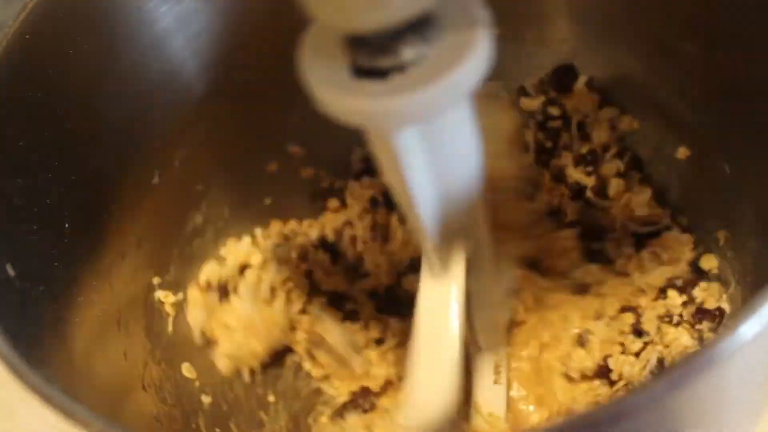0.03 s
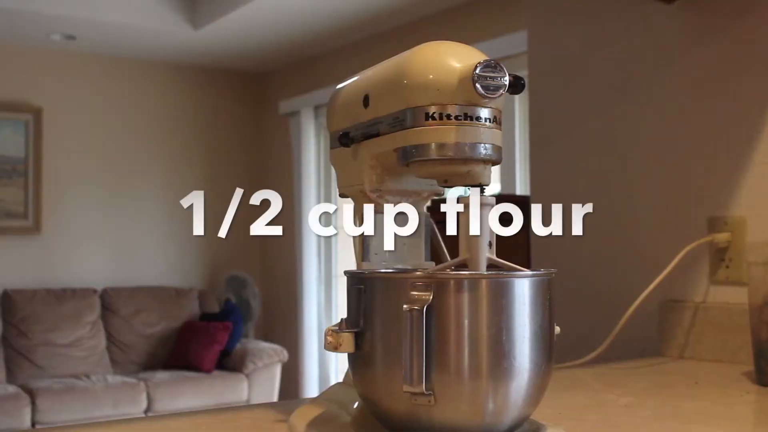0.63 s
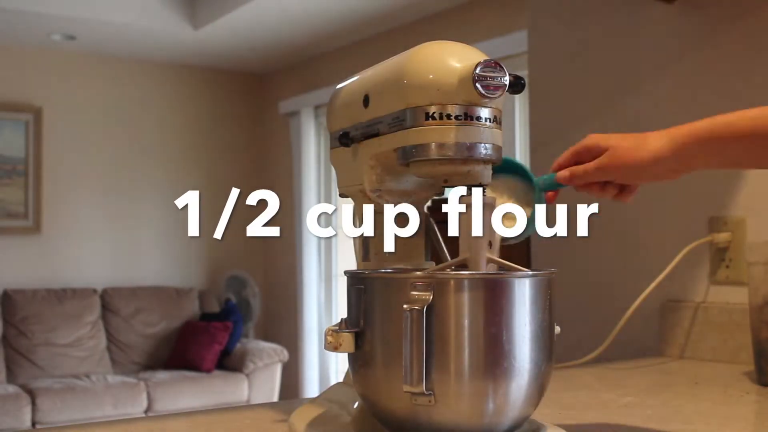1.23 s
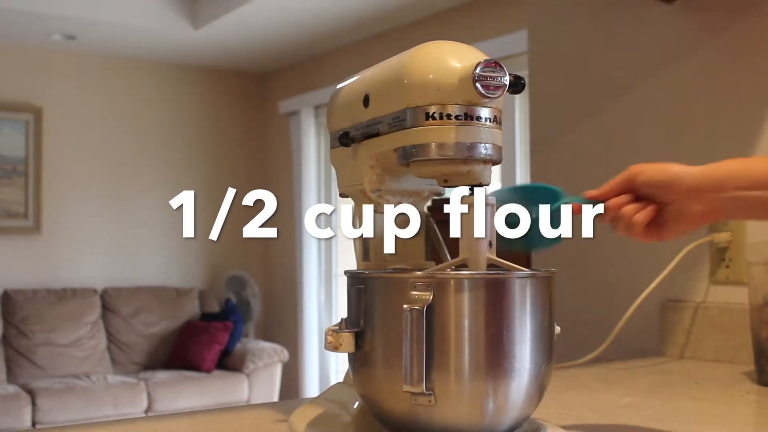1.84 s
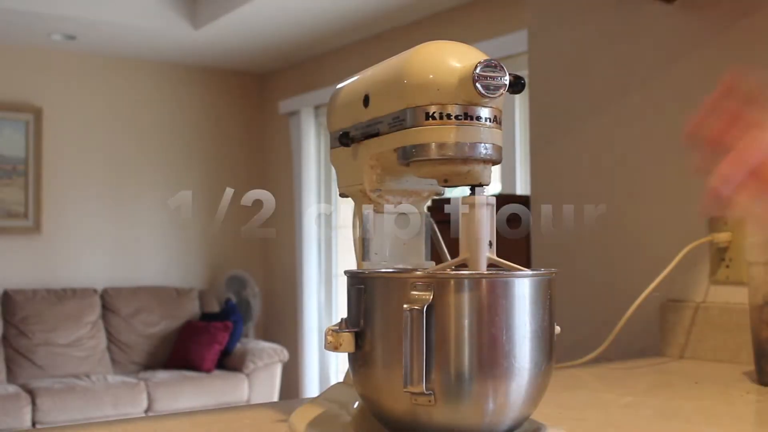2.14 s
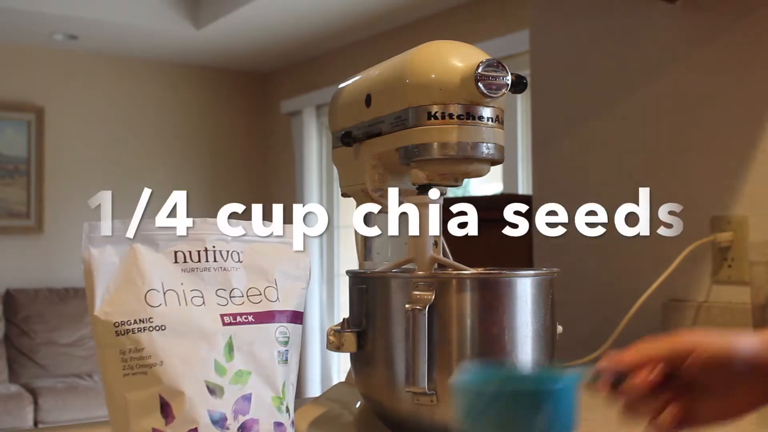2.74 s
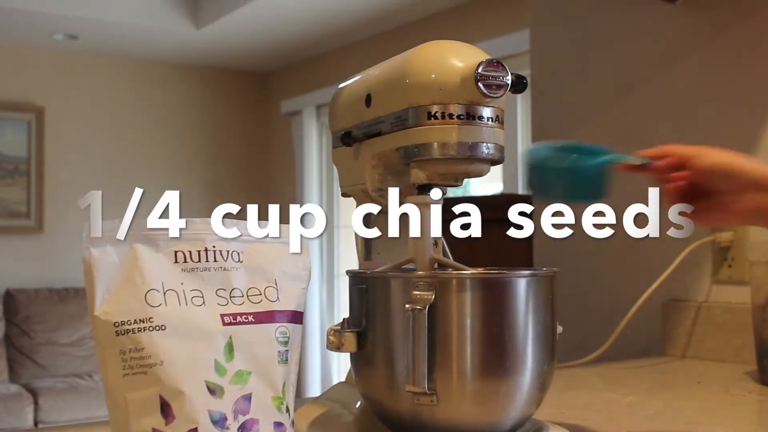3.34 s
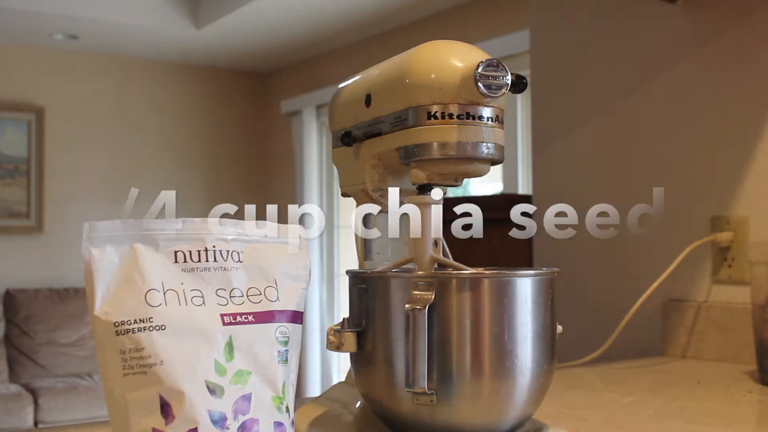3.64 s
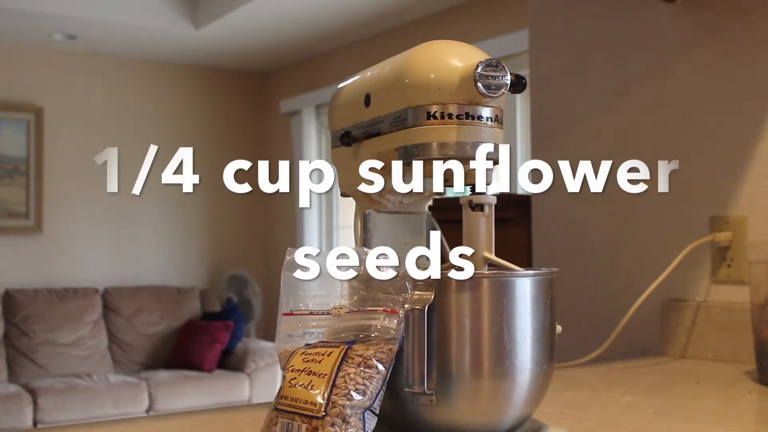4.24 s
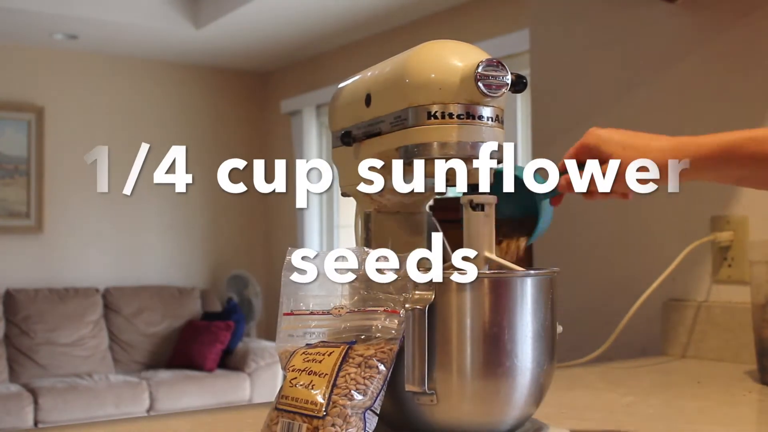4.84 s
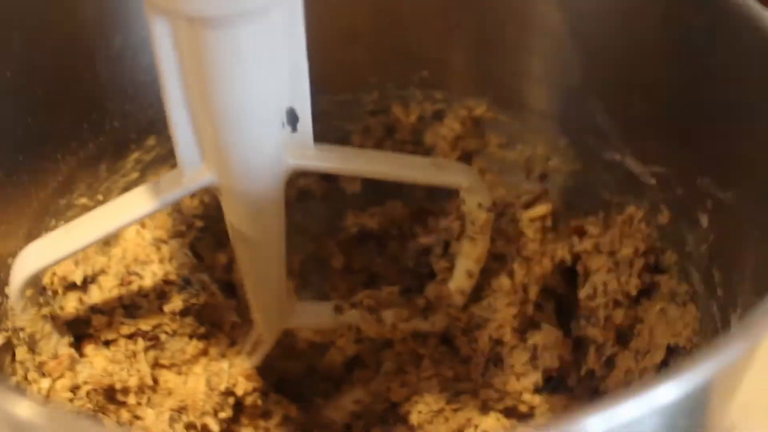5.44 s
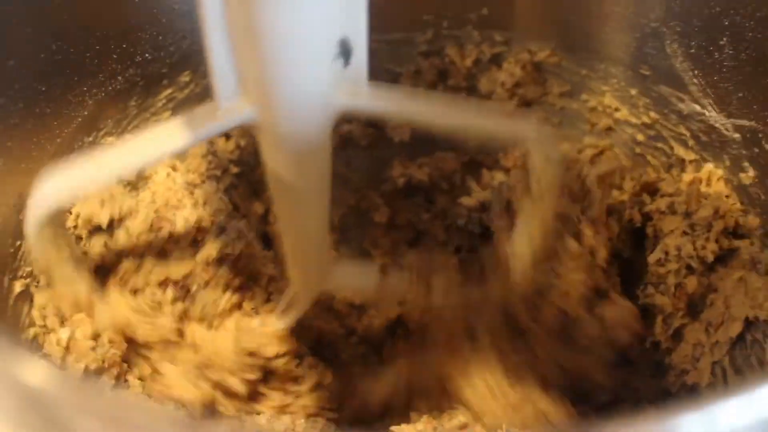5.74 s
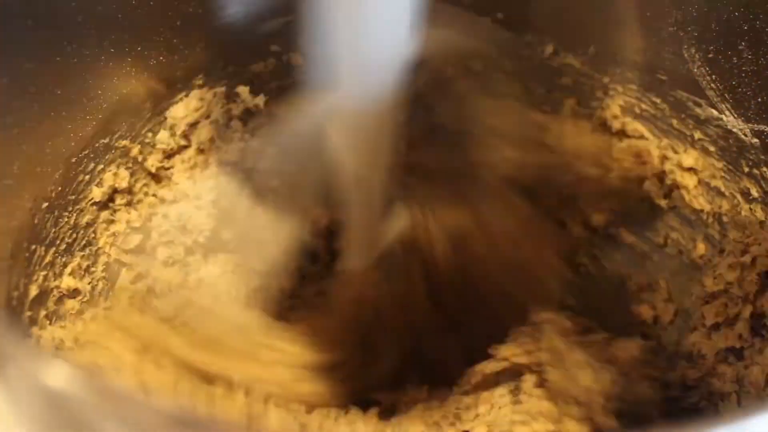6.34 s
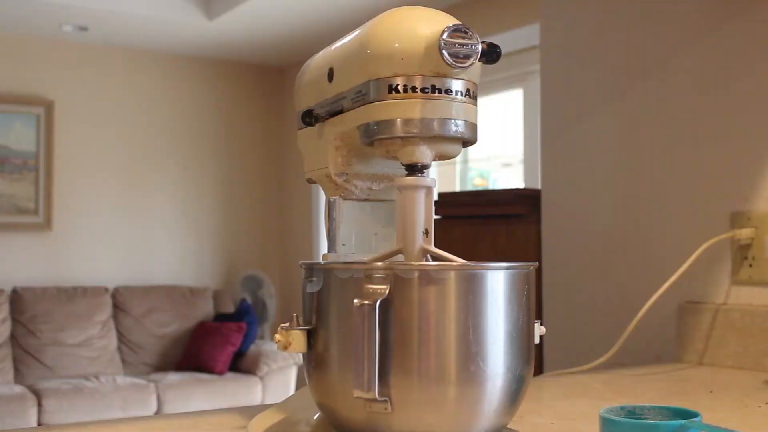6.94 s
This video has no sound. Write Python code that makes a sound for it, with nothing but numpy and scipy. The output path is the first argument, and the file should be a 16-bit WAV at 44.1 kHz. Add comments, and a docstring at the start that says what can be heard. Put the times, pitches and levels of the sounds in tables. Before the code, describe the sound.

A sharp click opens as a stand mixer coasts to a stop in dough. Over faint kitchen hiss, a measuring cup knocks quickly against a steel bowl, then clacks down three separate times with a bright ring. Between the clacks come soft thuds, sliding flour and seeds, and small plastic bag crinkles. Near the end the mixer runs for about a second, whining and rattling as its beater slaps the dough, then stops with a click.

```python
"""A sharp click, then a stand mixer coasts to a stop in cookie dough, over the hiss of a small kitchen.
Crumbs tick, things thud on the counter, flour and seeds slide. A measuring cup knocks on the steel bowl
and clacks down, ringing at each blow; a plastic bag crinkles. Then the motor runs for a second: it whines,
its gears rattle the housing and the beater slaps the dough. A soft rush rises at the end.
Impacts and friction are pulses, noise or grains through resonances; the whine is a sum of sines."""
import sys
import numpy as np
from scipy import signal
from scipy.fft import rfft, irfft
from scipy.io import wavfile
from scipy.ndimage import uniform_filter1d

SR = 44100
rng = np.random.default_rng(int(sys.argv[2]) if len(sys.argv) > 2 else 0)


def output_pcm(signal):
    """Save a mono or channel-first signal as 16-bit PCM at the path in sys.argv[1].

    Samples are clipped to [-1, 1] before scaling.
    """
    pcm = np.clip(np.atleast_2d(signal).T, -1, 1) * 32767
    wavfile.write(sys.argv[1], SR, np.round(pcm).astype(np.int16))


N = 317079
TAPS = 8192
T = np.arange(N) / SR
FREQ_HZ = np.maximum(np.arange(TAPS // 2 + 1) * SR / TAPS, 1)
SWITCH_ON_S, SWITCH_OFF_S = 5.780, 6.702

# dough dragged round the bowl: freq_hz, gain_db
DOUGH_SPECTRUM = [(24, -47), (40, -4.5), (382, -14.5), (570, -6), (646, -14), (852, 6.5), (942, -5.5),
                  (1440, -10.5), (2570, -2.5), (3060, -12.5), (4460, -7.5), (14800, -18.5), (16000, -11)]
# bowl ringing around the dough: freq_hz, width_hz, gain_db
FILLED_BOWL_MODES = [(575, 41, 2.5), (850, 61, -5), (2500, 130, -11), (3380, 43, -0.5)]
# room hiss: freq_hz, gain_db
AIR_SPECTRUM = [(15, -87), (25, -28), (92, 0), (117, -12), (149, -1.5), (180, -7.5), (326, -3), (677, -2),
                (1040, -2.5), (1890, -4.5), (3520, -6.5), (6050, -7.5), (8140, -11), (11000, -9.5),
                (16000, -14.5)]
# a sharp, bright click at the very start, then dry ticks: start_s, level_db, pitch_hz, t60_s
DRY_TICKS = [(.013, -19, 14600, 0.015), (.481, -45, 9000, 0.065), (.701, -39, 9000, 0.017),
             (.797, -43, 7000, .025), (.868, -42.5, 5000, 0.093), (.997, -36, 10900, 0.059),
             (1.032, -37, 10900, 0.03), (1.103, -42, 10000, .04), (4.181, -27.5, 5560, 0.007),
             (4.602, -25, 7000, 0.026), (5.422, -34, 10930, 0.018), (5.704, -41, 11000, 0.056),
             (5.738, -34, 8850, 0.018), (6.7625, -15, 9050, 0.017), (6.976, -35, 5170, 0.018),
             (6.997, -26.5, 13100, .005)]
# dough slapped on the bowl: start_s, level_db
DOUGH_SLAPS = [(.101, -32), (5.981, -24.5), (6.59, -25.5)]
# gears jerking into motion: start_s, level_db, pitch_hz, t60_s
GEAR_JERK = [(5.797, -16, 4540, 0.066)]
# hand and cup scuffs: middle_s, level_db, pitch_hz
HAND_SCUFFS = [(.288, -44, 5800), (.737, -49.5, 1970), (1.122, -51, 1690), (1.487, -44, 1550),
               (2.965, -55, 1800), (3.463, -52, 2900), (3.835, -51.5, 1770), (4.192, -53.5, 2370),
               (4.705, -52, 5900)]
# things set on the counter: start_s, level_db, pitch_hz, boom_db
COUNTER_THUDS = [(.827, -37.5, 197, -40), (.995, -41, 175, -46.5), (2.228, -52.5, 380, -59),
                 (2.619, -43, 240, -57), (3.655, -54, 100, -63), (4.402, -52, 280, -52),
                 (5.262, -49, 150, -51)]
# sliding flour and seeds: middle_s, half_length_s, level_db
INGREDIENT_POURS = [(1.166, 0.021, -44), (2.06, .035, -52), (3.725, .031, -50.5), (4.516, 0.0335, -47.5),
                    (4.75, 0.13, -52.5), (4.97, 0.054, -47.5)]
# measuring cup: freq_hz, width_hz, gain_db
CUP_MODES = [(3840, 1080, -16), (5120, 370, 0.5), (5540, 130, 0), (5890, 186, 6), (6080, 100, -2),
             (11000, 410, -8), (11370, 210, -15), (16400, 820, -24)]
# steel bowl and beater: freq_hz, width_hz, gain_db
BOWL_MODES = [(750, 600, -12.5), (1630, 260, 5), (2340, 220, -7), (2930, 130, -3), (3450, 150, -2.5),
              (3830, 240, -2), (4700, 3500, -14), (5950, 140, -4), (7170, 160, -10), (7930, 100, -4),
              (10950, 300, 1.5), (14200, 3000, -12.5)]
# cup on bowl: start_s, bowl_db, cup_db, cutoff_hz
BOWL_KNOCKS = [(1.5907, -29, -13.5, 12500), (1.686, -32.5, -35, 15000), (1.705, -27, -19, 14000),
               (1.7175, -22, -24, 14000), (1.7215, -23.5, -37, 12000), (1.7442, -22.5, -40, 12000),
               (1.777, -21.5, -39, 13000), (1.861, -12.5, -18.5, 2500), (4.749, -29.5, -22.5, 5600)]
# cup clacks: start_s, ring_db, pitch_ratio, crack_db, overload_pop_db, flight_s, rebound_db, chatter_db
CUP_CLACKS = [(2.119, 5.5, 1, -22, -51, 0.032, -15, -41.5), (3.5634, 4, 1, -23, -17, 0.036, -17, -32),
              (5.1964, 3, 0.99, -18.5, -33, .0354, -9, -35)]
# plastic bag crinkles: start_s, level_db
BAG_CRINKLES = [(2.379, -36), (3.887, -38), (4.033, -39), (4.109, -37)]
# motor housing, broad response: freq_hz, gain_db
HOUSING_SPECTRUM = [(40, -40.5), (110, -42), (150, -22), (240, -24.5), (500, -20), (900, -17.5),
                    (2900, -17.5), (4400, -10), (5800, -16.5), (9500, -17), (12200, -16), (14000, -12),
                    (16000, -24)]
# motor housing resonances: freq_hz, width_hz, gain_db
HOUSING_MODES = [(1152, 73, 0.5), (1244, 78, -8), (1616, 190, 0.5), (1696, 89, -3), (1930, 170, -7.5),
                 (2206, 360, -6.5), (3843, 155, -4.5), (5030, 116, -2.5), (10750, 660, -18),
                 (13200, 500, -29)]
# gear case resonances: freq_hz, width_hz, gain_db
GEAR_CASE_MODES = [(6800, 157, -0.5), (6800, 110, -13), (7360, 73, -3), (7830, 180, -8.5)]
# motor whine: pitch_hz, relative_db
WHINE_PARTIALS = [(480.2, -53), (1128.2, -38), (1440.6, -35), (1609.6, -38), (1752.4, -38), (1920.8, -43),
                  (2232.1, -39), (2269, -42), (2400.2, -42), (2881, -53), (5066, -42), (6614, -42),
                  (6726, -35), (6896, -37), (7068, -43), (7374.5, -39), (7689, -43)]
# brief silences: start_s, end_s
SILENCES = [(.339, .362), (2.419, 2.432)]


def undb(db):
    """Decibels to gain."""
    return 10 ** (np.asarray(db) / 20)


def noise():
    """White noise, rms 1."""
    return rng.standard_normal(N)


def walk(rate_hz):
    """Smooth random drift, spread 1."""
    step = int(SR / rate_hz)
    drift = uniform_filter1d(np.repeat(rng.standard_normal(N // step + 1), step)[:N], step)
    return drift / drift.std()


def grains(per_s, scatter_db):
    """Dense tiny impacts of uneven size, rms 1."""
    impacts = (rng.random(N) < per_s / SR) * np.sign(noise()) * undb(scatter_db * np.clip(noise(), -2, 2))
    return impacts / impacts.std()


def colour(points):
    """Power response through (freq_hz, gain_db) points."""
    hz, db = np.transpose(points)
    return undb(np.interp(np.log(FREQ_HZ), np.log(hz), db)) ** 2


def rings(modes, pitch_ratio=1, skirt=1):
    """Power response of (freq_hz, width_hz, gain_db) modes; more skirt, steeper flanks."""
    power = 0
    for hz, width_hz, db in modes:
        ratio = FREQ_HZ / (hz * pitch_ratio)
        detuning = (ratio - 1 / ratio) * hz / width_hz
        power += undb(db) ** 2 / (1 + detuning ** 2 / skirt) ** skirt
    return power


def impulse(power):
    """Minimum-phase impulse response of a power response, unit energy."""
    cepstrum = irfft(np.log(power / power.max() + 1e-12))
    cepstrum[0] /= 2
    cepstrum[TAPS // 2:] = 0
    response = irfft(np.exp(rfft(cepstrum)))
    return response / np.linalg.norm(response)


def through(x, power):
    """Pass x through a body with this power response."""
    return signal.oaconvolve(x, impulse(power))[:len(x)]


def burst(t60_s):
    """Decaying noise with a flattened spectrum, starting near rms 1."""
    fade = np.exp(-np.log(1000) * T[:2 * TAPS] / t60_s)
    raw = rng.standard_normal(2 * TAPS) * fade
    flat = through(raw, 1 / uniform_filter1d(np.abs(rfft(raw[:TAPS])) ** 2, size=21))
    return flat * np.linalg.norm(fade) / np.linalg.norm(flat)


def add(out, start_s, x):
    """Mix x into out at start_s."""
    i = max(int(start_s * SR), 0)
    out[i:i + len(x)] += x[:N - i]


def blows(events, width_ratio, skirt, contact_db):
    """Each blow rings one broad resonance: a contact, then dying chatter."""
    out = np.zeros(N)
    for start_s, db, hz, t60_s in events:
        force = burst(t60_s)
        force[0] += undb(contact_db) * np.linalg.norm(force)
        add(out, start_s, undb(db) * through(force, rings([(hz, hz * width_ratio, 0)], skirt=skirt)))
    return out


def swells(events, skirt):
    """Bell-shaped swells of friction, each through one resonance."""
    out, friction = np.zeros(N), grains(per_s=4300, scatter_db=3.5)
    for middle_s, half_s, db, hz, width_hz in events:
        near = np.abs(T - middle_s) < 2 * half_s
        swell = np.exp(-((T[near] - middle_s) / half_s) ** 2)
        out[near] += undb(db) * through(friction[near] * swell, rings([(hz, width_hz, 0)], skirt=skirt))
    return out


def coasting(level_db=-29.5, fall_db_per_s=61.5, end_s=.34):
    """The beater drags crumbly dough round the bowl, fading until it stands still."""
    crumbs = grains(per_s=7000, scatter_db=2.2) * undb(0.59 * walk(43))
    bowl = through(crumbs, colour(DOUGH_SPECTRUM) + rings(FILLED_BOWL_MODES))
    return bowl * undb(level_db - fall_db_per_s * T) * (T < end_s)


def air():
    """Steady hiss over the faint, wavering rumble of the room."""
    hiss = through(noise(), colour(AIR_SPECTRUM)) * undb(-53.6 + 0.49 * walk(4.15))
    rumble = through(noise(), rings([(118, 85, 0)], skirt=1.7)) * undb(-77.5 + 3 * walk(11))
    return hiss + rumble


def ticks():
    """A sharp, bright click at the very start; later, small dry impacts of plastic, crumbs and seeds."""
    return blows(DRY_TICKS, width_ratio=1.0, skirt=0.63, contact_db=-12)


def beater(slap_hz=707, slap_t60_s=0.08):
    """The beater slaps dough on the bowl, jerks at switch-on and drags low after switch-off."""
    slaps = [(start_s, db, slap_hz, slap_t60_s) for start_s, db in DOUGH_SLAPS]
    lag_s, half_s, drag_db, drag_hz, width_hz = .05, 0.046, -45, 210, 330
    drag = swells([(SWITCH_OFF_S + lag_s, half_s, drag_db, drag_hz, width_hz)], skirt=1.6)
    return blows(GEAR_JERK + slaps, width_ratio=0.45, skirt=1.1, contact_db=-7) + drag


def scuffs(half_s=0.0184, width_ratio=0.21):
    """Hand and cup brush briefly past things."""
    events = [(middle_s, half_s, db, hz, hz * width_ratio) for middle_s, db, hz in HAND_SCUFFS]
    return swells(events, skirt=1.05)


def thuds(t60_s=.17, boom_lag_s=.028, boom_hz=98, boom_t60_s=0.25):
    """Things are set down softly; the counter booms after each."""
    contacts = [(start_s, db, hz, t60_s) for start_s, db, hz, _ in COUNTER_THUDS]
    booms = [(start_s + boom_lag_s, db, boom_hz, boom_t60_s) for start_s, _, _, db in COUNTER_THUDS]
    return (blows(contacts, width_ratio=0.76, skirt=0.9, contact_db=-13.5)
            + blows(booms, width_ratio=0.46, skirt=0.87, contact_db=-14))


def pours(centre_hz=9300, width_hz=21000):
    """Flour and seeds slide with a bright hiss."""
    events = [(middle_s, half_s, db, centre_hz, width_hz) for middle_s, half_s, db in INGREDIENT_POURS]
    return swells(events, skirt=0.95)


def cup_ring(pitch_ratio, damping_s=0.026):
    """One blow on the cup, peak 1; the contact point shifts the ring, the hand damps it."""
    ring = impulse(rings(CUP_MODES, pitch_ratio, skirt=1.58)) * np.exp(-(T[:TAPS] / damping_s) ** 2)
    return ring / np.abs(ring).max()


def knocks(skid_hz=3730, stand_hz=258):
    """The cup taps the bowl, skids on the rim and shakes the stand; duller contacts skid less."""
    out = np.zeros(N)
    for start_s, bowl_db, cup_db, cutoff_hz in BOWL_KNOCKS:
        contact = 1 / (1 + (FREQ_HZ / cutoff_hz) ** 3.8)
        contact /= 1 + (400 / FREQ_HZ) ** 4  # thin steel radiates little bass
        force = undb(-3) * burst(t60_s=.022)
        force[0] += undb(19)  # clean hit ahead of the buzz
        bowl = through(force, rings(BOWL_MODES, skirt=1.16) * contact)
        skid_gain = undb(-12) * np.interp(skid_hz, FREQ_HZ, contact)
        skid = skid_gain * through(burst(t60_s=0.09), rings([(skid_hz, 1800, 0)], skirt=1.6))
        stand = undb(-34) * through(burst(t60_s=0.105), rings([(stand_hz, 150, 0)], skirt=1.7))
        add(out, start_s, undb(bowl_db) * (bowl + skid + stand))
        add(out, start_s, undb(cup_db) * cup_ring(pitch_ratio=1.02))
    return out


def clacks(edge_lag_s=.006, rebound_ratio=0.97):
    """The cup lands with a ring and a crack, then rebounds; a low overload pop on the hardest clacks."""
    out = np.zeros(N)
    overload_pop = np.hanning(40)
    surface = rings([(2100, 5200, 0)], skirt=3.6)
    for clack in CUP_CLACKS:
        start_s, ring_db, pitch_ratio, crack_db, overload_pop_db, flight_s, rebound_db, chatter_db = clack
        add(out, start_s, undb(ring_db) * cup_ring(pitch_ratio))
        add(out, start_s, undb(crack_db) * through(burst(t60_s=0.012), surface))
        add(out, start_s, undb(overload_pop_db) * overload_pop)
        for edge in range(2):
            landing_s = start_s + flight_s + edge * edge_lag_s
            add(out, landing_s, undb(rebound_db) * cup_ring(pitch_ratio * rebound_ratio))
            add(out, landing_s, undb(chatter_db) * through(burst(t60_s=0.09), surface))
    return out


def bag(pitch_hz=12700, t60_s=0.019, grip_s=4.108, grip_length_s=.063, grip_db=-44.5):
    """Thin plastic: single crinkles, and a run of crackles when gripped."""
    events = [(start_s, db, pitch_hz, t60_s) for start_s, db in BAG_CRINKLES]
    crinkles = blows(events, width_ratio=0.25, skirt=1.6, contact_db=-9)
    gripped = (T > grip_s) & (T < grip_s + grip_length_s)
    crackles = grains(per_s=1200, scatter_db=6) * gripped
    return crinkles + undb(grip_db) * through(crackles, rings([(pitch_hz, 3000, 0)], skirt=2.2))


def mixer(tooth_hz=168.1, shaft_hz=56.0, sweep_hz=14.5, settle_s=.1, rundown_db_per_s=195):
    """Loose gears shake the housing and chatter tooth by tooth; the motor whines while powered."""
    since_on_s, since_off_s = np.maximum(T - SWITCH_ON_S, 0), np.maximum(T - SWITCH_OFF_S, 0)
    running = np.clip(since_on_s / 0.011, 0, 1)
    powered = np.clip(since_on_s / 0.038, 0, 1) * np.exp(-since_off_s / 0.011)
    rattle_db = -21.5 + 3.5 * np.exp(-since_on_s / settle_s) - rundown_db_per_s * since_off_s
    sweep_db = 0.4 * np.cos(2 * np.pi * sweep_hz * (T - 6.4))  # load swings as the beater sweeps
    dip_db = -7 * np.exp(-((T - 5.89) / 0.0054) ** 2)
    swing_db = sweep_db + dip_db
    shaft_time_s = np.cumsum(1 + 0.00119 * walk(12)) / SR  # speed wavers under the dough load
    wobble = 1 + 0.099 * np.sin(2 * np.pi * shaft_hz * shaft_time_s)  # shaft slightly out of true
    shake = grains(per_s=5000, scatter_db=2.5) * undb(1.4 * walk(60)) * wobble
    housing = through(shake, colour(HOUSING_SPECTRUM) + rings(HOUSING_MODES, skirt=1.96))
    mesh = np.exp(-(shaft_time_s * tooth_hz % 1) / .36)  # each tooth strikes, then slides
    teeth = noise() * mesh * undb(2.1 * walk(130))
    gears = through(teeth / teeth.std(), rings(GEAR_CASE_MODES, skirt=1.17))
    driven = undb(-21.0 + 0.79 * swing_db) * gears + undb(-1.0) * whine(shaft_time_s)
    return running * housing * undb(rattle_db + swing_db) + powered * driven


def whine(shaft_time_s):
    """Motor partials follow the shaft, each fluttering in level and phase."""
    out = np.zeros(N)
    for hz, db in WHINE_PARTIALS:
        amplitude = np.sqrt(2) * undb(db + 2.0 * walk(20))
        out += amplitude * np.sin(2 * np.pi * hz * shaft_time_s + 0.24 * walk(40))
    return out


def rush(start_s=7.0, rise_s=0.033, level_db=-48.5):
    """A soft, hollow rush rises and holds."""
    hollow = rings([(196, 120, 0.5), (1300, 780, -1), (5900, 630, -5.5)], skirt=0.9)
    return undb(level_db) * np.clip((T - start_s) / rise_s, 0, 1) * through(noise(), hollow)


def room(direct, tail_db, early_db):
    """Direct sound, quick reflections off counter and wall, and the kitchen's short tail."""
    early = burst(t60_s=0.035) * np.clip(T[:2 * TAPS] / 0.0018, 0, 1)
    tail = burst(t60_s=0.19) * np.clip(T[:2 * TAPS] / 0.009, 0, 1)
    echo = undb(early_db) * early / np.linalg.norm(early) + undb(tail_db) * tail / np.linalg.norm(tail)
    return direct + signal.oaconvolve(direct, echo)[:N]


def scene():
    """Mixer, cup and ingredients in the kitchen, mono."""
    machine = coasting() + mixer() + beater()
    cup = room(clacks(), tail_db=-11.0, early_db=-5) + room(knocks(), tail_db=-8.5, early_db=-9)
    handling = room(ticks() + bag(), tail_db=-13.5, early_db=-12) + thuds() + scuffs() + pours()
    return (machine + cup + handling + air() + rush())[None]


def record(dry):
    """The sound falls silent twice for a moment, overload on the hardest clacks, and a steep top cut."""
    live = 1 - sum((T > start_s) & (T < end_s) for start_s, end_s in SILENCES)
    cutoff_hz = 15800
    lowpass = signal.ellip(8, .2, 70, cutoff_hz, fs=SR, output="sos")
    return signal.sosfilt(lowpass, np.clip(dry * live, -1, 1))


dry = scene()
out = record(dry)
output_pcm(out)
```